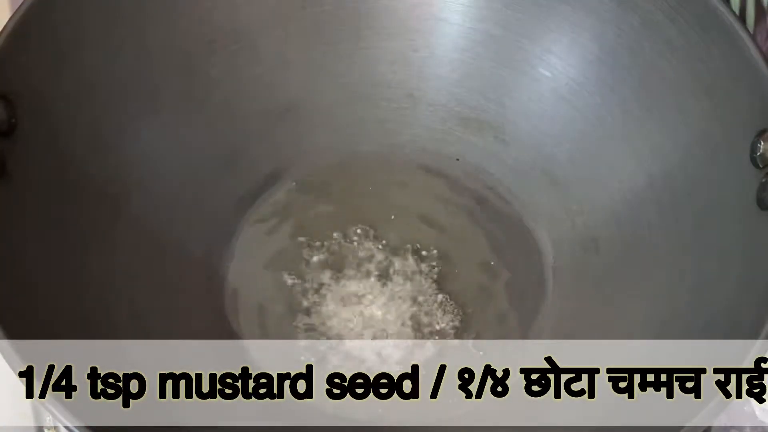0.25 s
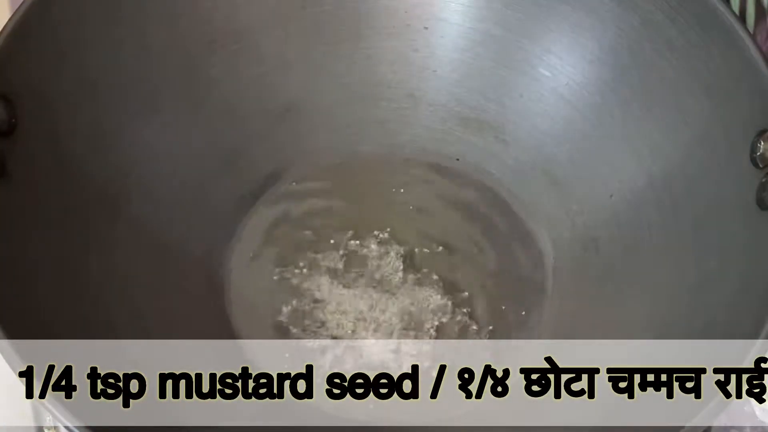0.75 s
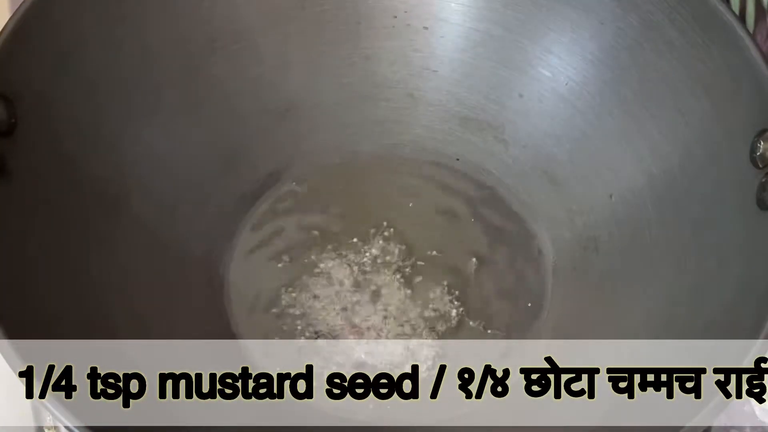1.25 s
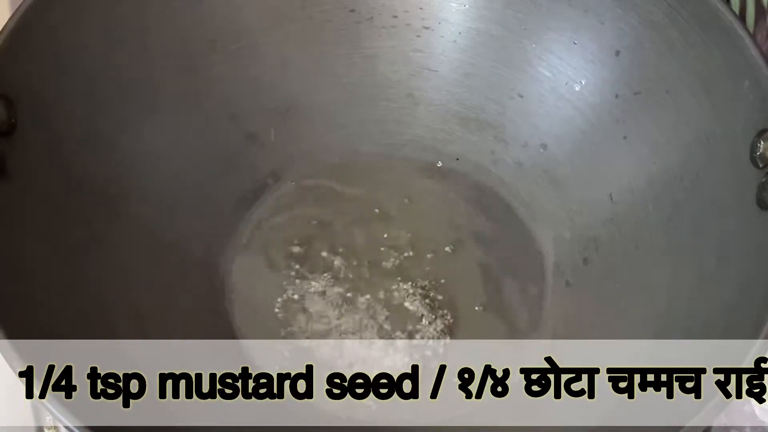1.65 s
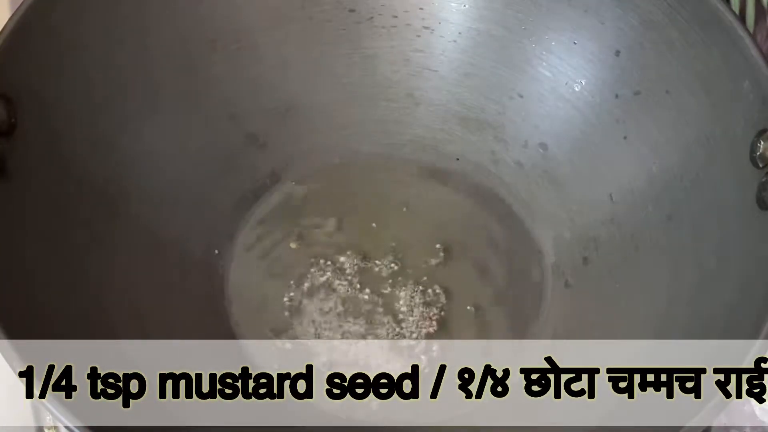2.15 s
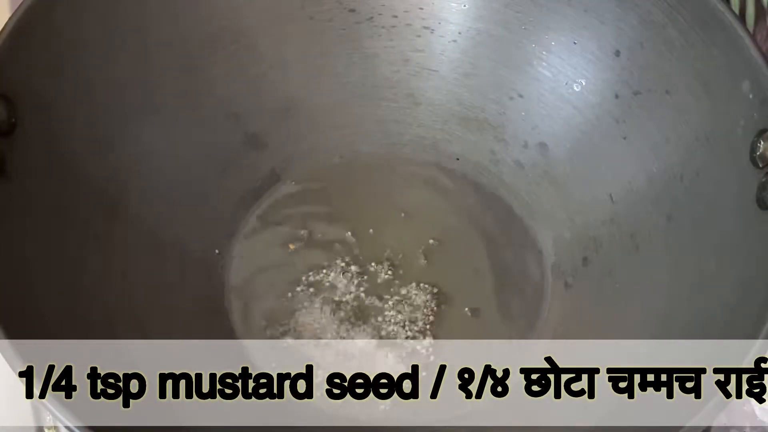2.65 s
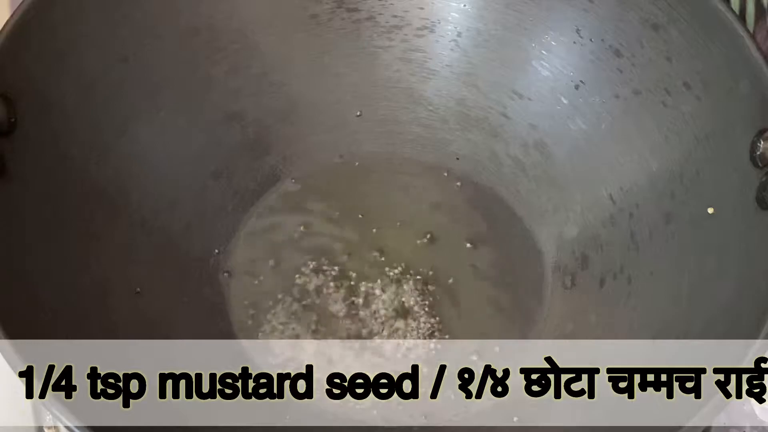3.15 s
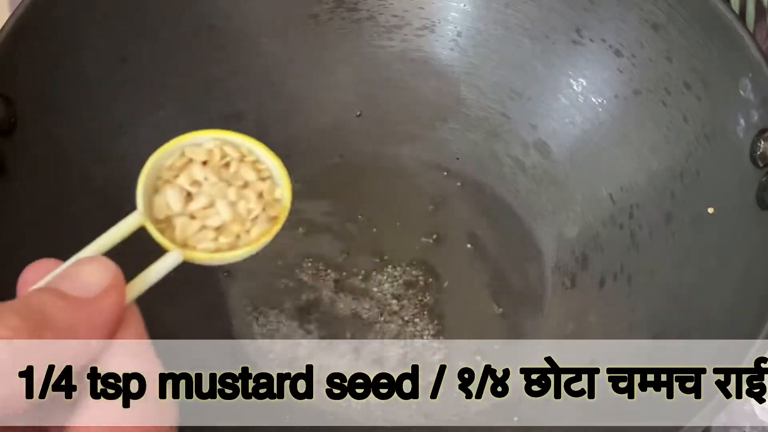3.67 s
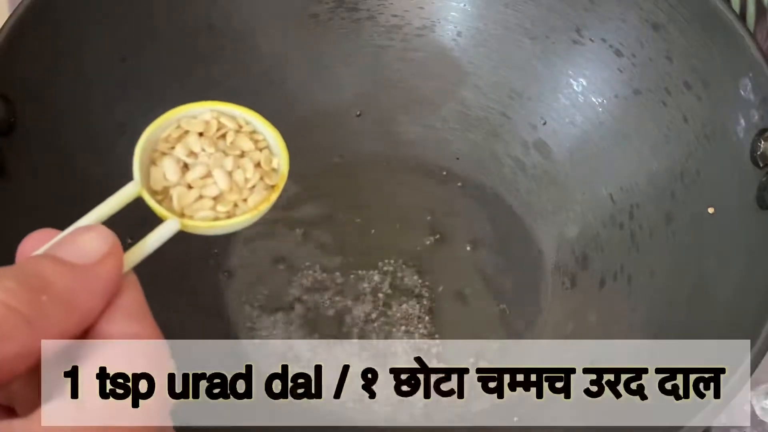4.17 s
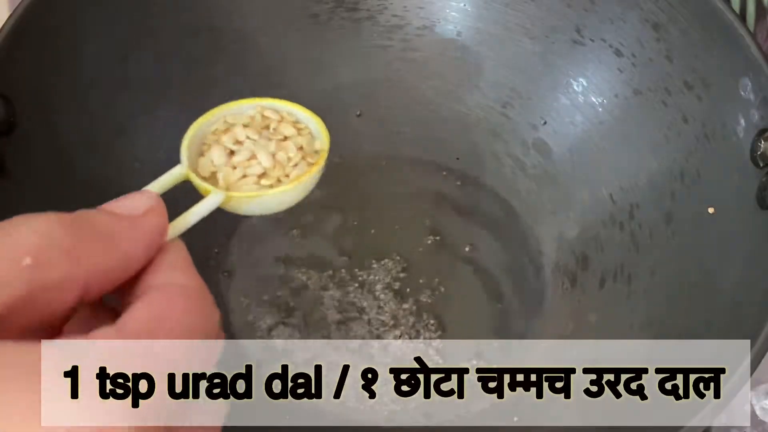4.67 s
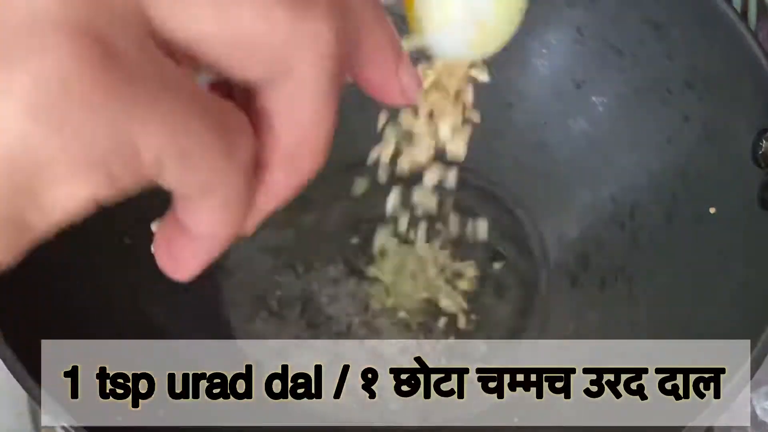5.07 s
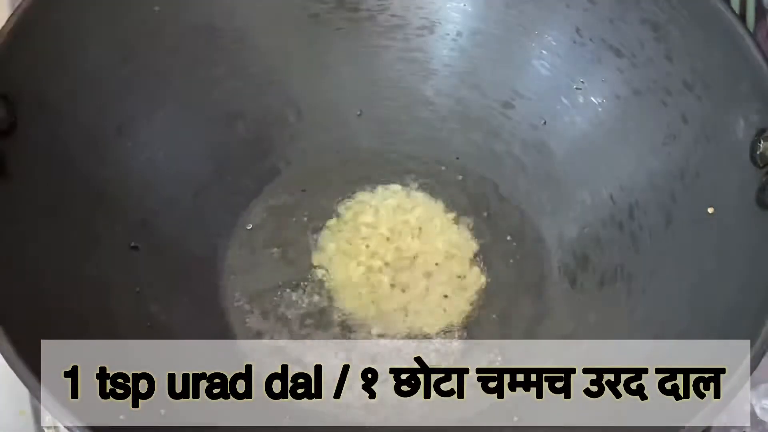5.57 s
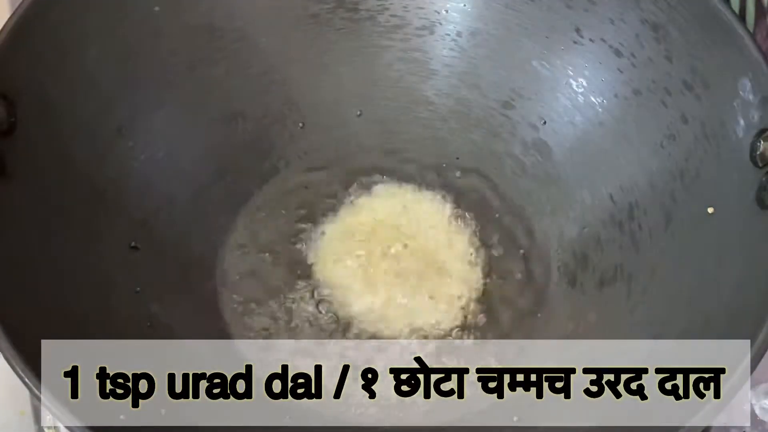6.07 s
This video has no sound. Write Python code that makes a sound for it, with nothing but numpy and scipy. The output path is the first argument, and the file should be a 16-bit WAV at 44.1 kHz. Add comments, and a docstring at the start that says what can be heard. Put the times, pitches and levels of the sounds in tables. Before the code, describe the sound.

A close view of frying in a steel wok in a kitchen. From 0 to 0.5 s, a faint fine sizzle carries several crisp, high snaps; then it thins to isolated ticks and pops. At about 1.3 s everything fades briefly to near silence and returns by 1.5 s. Around 2 s, several lower, slightly ringing pops come close together; a second short dip falls near 2.65 s. From 2.8 s the oil livens: mustard seeds burst rapidly, bright and dry, in uneven flurries, dense through 3 to 4.4 s. Two soft dull bumps come at 4.7 and 4.77 s, as the sizzle surges around the lentils going in. It eases near 5.4 s, then swells again with steady crackling until the end at 6.3 s. Pops ring briefly in the bowl and room; beneath lie a quiet, wavering low motor hum and a dull airy rush.

```python
"""Mustard seeds in a hot wok

Close on a steel wok: seeds fry in hot oil, and a spoonful of lentils joins near five seconds, as the sizzle surges.
Steam bubbles burst as short pitched pops, sparse then dense; in lively oil a loud one sets off a flurry of small ones.
Noise echoes and faint resonances let them ring on in the bowl and kitchen; random tiny grains make the fine sizzle.
Beneath lie wavering motor tones, a rush of filtered noise and two soft knocks; twice the whole level dips briefly.
"""
import sys
import numpy as np
from scipy import signal
from scipy.fft import rfft, irfft
from scipy.io import wavfile

SR = 44100
rng = np.random.default_rng(int(sys.argv[2]) if len(sys.argv) > 2 else 0)


def file_out(sig):
    """Save sig as 16-bit WAV at sys.argv[1]."""
    # one column per channel
    cols = np.atleast_2d(sig).T
    # limit, then scale
    lim = np.clip(cols, -1, 1)
    pcm = np.round(lim * 32767).astype(np.int16)
    wavfile.write(sys.argv[1], SR, pcm)


N = 278712  # length in samples

# loud bursting bubbles: start_s, relative level_db, nominal pitch_hz, ringing_cycles (to fall 60 dB)
LOUD_POPS = [(0.095, -21, 6660, 6.1), (0.142, -7.5, 7900, 1.7), (0.1841, -20, 6110, 32),
             (0.2017, -18.5, 5300, 4.3), (0.2578, -15.0, 6500, 20), (0.3247, -11, 13880, 1.5),
             (0.3615, -12.0, 9300, 11), (0.378, -15.0, 8590, 14), (0.5124, -24, 11700, 13),
             (0.6566, -19.5, 6160, 8), (0.6764, -22.5, 7990, 14), (0.785, -28.5, 7240, 6.8),
             (1.06, -19.5, 14000, 8), (1.271, -16, 12390, 3), (1.5265, -11.0, 6350, 7.7),
             (1.8612, -8.5, 2700, 2.9), (1.8914, -12, 10360, 3.4), (1.988, -20.5, 14000, 2.4),
             (2.029, -15.5, 2700, 22.5), (2.1083, -29.5, 2940, 4.3), (2.132, -19.5, 5700, 21),
             (2.2127, -20, 3060, 11), (2.2259, -18, 3040, 10), (2.2304, -14.0, 9480, 2.6),
             (2.3294, -20.5, 3100, 19), (2.3799, -13, 6670, 20), (2.409, -21.0, 3200, 18),
             (2.4507, -13.0, 2900, 11.3), (2.554, -21.5, 6060, 6.3), (2.7026, -11, 4670, 5),
             (2.7243, -23, 13960, 6.8), (2.8444, -14.5, 12930, 6.6), (2.889, -11, 11800, 4.8),
             (2.911, -11.5, 3610, 10.5), (2.983, -12.5, 4520, 6.8), (3.0485, -8.5, 7140, 7.9),
             (3.0632, -14.5, 6150, 25), (3.1074, -17, 12040, 12.6), (3.1644, -6.5, 9430, 1.85),
             (3.214, -5, 3590, 2.7), (3.2291, -7, 3480, 6.9), (3.2745, -9, 11940, 5.4),
             (3.2798, -9.5, 3570, 6.6), (3.288, -12.5, 5200, 8.5), (3.3117, -7, 13870, 2.3),
             (3.4158, -12, 11300, 2.9), (3.4224, -18, 7100, 5.7), (3.4933, -12, 3800, 7),
             (3.4993, -15, 6690, 3.4), (3.565, -17.5, 11160, 5.8), (3.608, -12, 4620, 3.1),
             (3.6356, -10.5, 6000, 4.2), (3.6652, -12, 13900, 6.9), (3.7451, -12.5, 6930, 34),
             (3.752, -13.5, 3570, 7.9), (3.764, -9, 4120, 3.8), (3.7718, -6.5, 3200, 3.6),
             (3.8375, -13.5, 4795, 4.5), (3.8522, -17.0, 5270, 19), (3.8881, -18, 9800, 7.7),
             (3.9335, -9.5, 6850, 6.2), (3.9414, -10.5, 4870, 1.76), (3.9648, -8, 12090, 3.4),
             (4.0057, -14, 3680, 12.2), (4.0545, -9.5, 3710, 5.9), (4.065, -4.5, 5590, 3.7),
             (4.083, -10, 4790, 5), (4.0952, -11.5, 3670, 2.8), (4.1373, -9, 5460, 5.1),
             (4.2099, -19.5, 5350, 8), (4.2372, -8, 5310, 9.1), (4.258, -5, 3850, 3.9),
             (4.2852, -9.0, 10970, 2.66), (4.378, -18, 5580, 4.2), (4.4198, -12.5, 12800, 3.4),
             (4.4284, -16.5, 12920, 6.9), (4.471, -11, 4710, 2.9), (4.5507, -13.5, 5680, 17.3),
             (4.5605, -10, 7010, 6.8), (4.6201, -7.0, 6670, 1.95), (4.681, -16, 14080, 7.1),
             (4.742, -5.5, 6290, 4), (4.766, -9.5, 11740, 2.4), (4.7904, -18, 10970, 4.6),
             (4.8878, -11, 6560, 4.3), (4.8911, -10, 3810, 2.8), (4.9098, -20, 6570, 2.6),
             (4.9148, -14.5, 6640, 23), (4.921, -9.5, 7100, 15), (4.928, -20, 7060, 18),
             (4.986, -14.5, 4080, 5.5), (5.0433, -14, 9200, 4.1), (5.05, -17, 9980, 9.3),
             (5.1176, -12, 9500, 19), (5.1627, -9.5, 11360, 5), (5.192, -13, 5900, 8.6),
             (5.2453, -7.5, 4500, 4.6), (5.2695, -12.5, 6160, 10.3), (5.2966, -7, 3570, 3.2),
             (5.3451, -12, 4290, 6.4), (5.3538, -13.5, 4554, 5), (5.4096, -16.5, 4560, 6.4),
             (5.4632, -7, 3810, 4.1), (5.492, -15, 5520, 8.1), (5.5294, -10.5, 5970, 10.4),
             (5.6143, -16, 6600, 7.1), (5.6223, -24, 6030, 35), (5.6363, -12.5, 6940, 3),
             (5.6581, -13, 4600, 5.1), (5.7293, -20, 5850, 10.6), (5.8182, -7.5, 4840, 5.3),
             (5.8276, -8, 4900, 3.4), (5.8461, -10, 3750, 10), (5.8791, -9.5, 5000, 12.6),
             (5.9877, -13, 5820, 11), (6.004, -11.5, 4245, 4.7), (6.0982, -10, 7700, 4.9),
             (6.1336, -12.0, 4850, 6.3), (6.178, -14, 6040, 15), (6.2134, -8.5, 4340, 4.8),
             (6.2758, -12.5, 5730, 9.3), (6.298, -7.5, 3930, 5.2)]
# vigour of the frying, as the relative level of its fine sizzle: time_s, vigour_db
VIGOUR = [(0, -50.5), (.38, -52), (.5, -59), (.9, -58), (1.7, -67.5), (2.0, -58), (2.55, -62), (2.8, -48),
          (3.25, -51), (4.1, -52), (4.42, -57), (4.7, -46), (5, -47), (5.45, -55.5), (5.9, -49),
          (6.32, -47)]


def from_db(db):
    """Decibels to amplitude gain."""
    return 10 ** (np.asarray(db) / 20)


def rms_one(x):
    """Scale to unit rms."""
    return x / np.sqrt(np.mean(x ** 2) + 1e-20)


def in_time(rows):
    """Read a curve of (time_s, value) rows at every sample."""
    return np.interp(np.arange(N) / SR, *np.transpose(rows))


def at_hz(points, hz):
    """Read a spectrum on a log-frequency axis."""
    points = np.array(points)
    return np.interp(np.log(np.maximum(hz, 1)), np.log(points[:, 0]), points[:, 1])


def coloured(x, points):
    """Weight a sound by a spectrum in dB."""
    size = x.shape[-1]
    gain = from_db(at_hz(points, np.fft.rfftfreq(size, 1 / SR)))
    return irfft(rfft(x) * gain, size)


def drift(rate_hz):
    """Slow random movement of unit rms: noise with little left above the given rate."""
    hz = np.fft.rfftfreq(N, 1 / SR)
    noise = rfft(rng.standard_normal(N))
    return rms_one(irfft(noise / (1 + (hz / rate_hz) ** 2) ** 2, N))


def ring(clicks, hz, t60):
    """A resonance: a unit click starts a cosine of height 1 that falls 60 dB in t60 seconds."""
    radius = from_db(-60 / (t60 * SR))
    step = 2 * np.pi * min(hz, .45 * SR) / SR  # radians per sample
    top = [1, -radius * np.cos(step)]
    bottom = [1, -2 * radius * np.cos(step), radius * radius]
    return signal.lfilter(top, bottom, clicks + 1e-18)


def bell(x, hz, width_hz, gain_db):
    """Raise or lower one band by adding a share of what a resonant peak lets through."""
    band = signal.lfilter(*signal.iirpeak(hz, hz / width_hz, fs=SR), x)
    return x + (from_db(gain_db) - 1) * band


def panned(x, left_db):
    """Lean a sound to one side; left_db is left minus right."""
    return x * from_db(np.array([[.5], [-.5]]) * left_db)


def radiate(x, edge_hz):
    """Small bubbles radiate hardly any bass: a steep high-pass."""
    return signal.sosfilt(signal.butter(8, edge_hz, "high", fs=SR, output="sos"), x)


def sizzle(per_s, spread_db, cycles, count=16):
    """Fine fizz of rms 1: tiny bubbles born at random times each ring at one of count pitches."""
    # spectrum of the sizzle: frequency_hz, relative level_db
    colour = [(2500, -3), (3600, -6), (4800, -12.5), (6000, -3.5), (7500, -4), (8400, -9), (9600, -5.5),
              (12000, -3), (15500, -6.5)]
    sizes = from_db(spread_db * np.minimum(rng.exponential(1, N), 3)) * rng.choice([-1, 1], N)
    born = rng.random(N) < per_s / SR
    pitch_of = rng.integers(0, count, N)
    grains = 0
    for k, hz in enumerate(np.linspace(3000, 15500, count)):
        clicks = sizes * born * (pitch_of == k)
        grains = grains + ring(clicks, hz, cycles / hz) * np.sqrt(hz)
    return rms_one(coloured(radiate(grains, edge_hz=2420), colour))


def hum(waver_hz):
    """Motor tones under the frying: each sine wavers slowly in strength and phase."""
    # motor tones: pitch_hz, rms_db (mean of the sides), unsteadiness (0-1), left_minus_right_db
    tones = [(72.2, -67.5, 0.7, -1), (95.9, -66, 0.5, -0.5), (119.4, -51.5, 1, -1.5), (128.6, -59, 1, -3.5),
             (149.2, -51, 0.22, 0.5), (256.2, -66, 0.83, -3.5), (291, -65, 0.95, -4),
             (368, -69.5, 0.3, -17)]
    t = np.arange(N) / SR
    out = 0
    for hz, db, unsteady, left_db in tones:
        wander = (drift(waver_hz) + 1j * drift(waver_hz)) / np.sqrt(2)
        waver = 1 - np.clip(unsteady, 0, 1) + unsteady * wander
        turning = np.exp(2j * np.pi * (hz * t + rng.random()))
        tone = rms_one(np.real(waver * turning))
        out = out + panned(from_db(db) * tone, left_db)
    return out


def air(level_db):
    """A dull steady rush around the stove: filtered noise, its left-right likeness set by frequency."""
    # spectrum of the rush: frequency_hz, relative level_db (per Hz)
    colour = [(20, -15), (55, -10.5), (85, -3.5), (130, 5), (200, -1.5), (290, -3), (400, -7), (520, -8),
              (750, -13.5), (1150, -14.5), (1600, -13), (2100, -19.5), (2900, -21), (4300, -39),
              (16000, -28)]
    # left-right likeness of the rush: frequency_hz, correlation (-1 to 1)
    likeness = [(60, 1), (200, 0.79), (380, 1), (700, 0.37), (1300, -0.18), (2400, -0.0021), (4400, 1)]
    mid, side = rfft(rng.standard_normal((2, N)))
    alike = np.clip(at_hz(likeness, np.fft.rfftfreq(N, 1 / SR)), -1, 1)
    both = irfft(np.sqrt(1 + alike) * mid + np.sqrt(1 - alike) * side * [[1], [-1]], N)
    return from_db(level_db) * rms_one(coloured(both, colour))


def small_pops(count=130):
    """Rows like those of the loud bubbles, by chance: thicker in livelier oil, mostly in flurries."""
    simmer_db, lively_db = -58, -52  # vigour where small bubbles begin, and where they reach full rate
    flurry_share, flurry_s = .65, .025  # share that follows loud bursts, and decay time of a flurry
    level_db, spread_db = -22, 3.0  # typical relative level and its spread
    pitch_hz, pitch_spread_oct = 6550, .38
    ringing_cycles, ringing_spread_oct = 4.3, .81
    t = np.arange(0, N / SR, .001)
    vigour_db = np.interp(t, *np.transpose(VIGOUR))
    lively = np.clip((vigour_db - simmer_db) / (lively_db - simmer_db), 0, 1)
    stirred = sum((t > s) * np.exp(-abs(t - s) / flurry_s) for s, *_ in LOUD_POPS)
    share = np.clip(flurry_share, 0, 1)
    due = np.cumsum(lively * (1 - share + share * stirred / stirred.mean()))
    # even shares of the summed rate, each jittered, become burst times
    times = np.interp((np.arange(count) + rng.random(count)) / count, due / due[-1], t)
    level, pitch, ringing = np.clip(rng.standard_normal((count, 3)), -2, 2).T
    return np.column_stack([times,
                            level_db + spread_db * level,
                            pitch_hz * 2 ** (pitch_spread_oct * pitch),
                            ringing_cycles * 2 ** (ringing_spread_oct * ringing)])


def burst(db, hz, cycles, size=1024):
    """A bubble opens a little cavity in the oil, which rings briefly and rises in pitch as it fills."""
    age = np.arange(size) / SR * hz / max(cycles, 1)  # 1 when the tone has fallen 60 dB
    pitch = hz * (.98 + .2 * np.minimum(age, 1))
    phase = 2 * np.pi * (np.cumsum(pitch) - pitch[0]) / SR
    return from_db(db - 60 * age) * np.cos(phase)


def pops(level_db, scatter_db, scatter_t60, bowl_db, bowl_t60, width, pan_db, size=1024):
    """Bursts at the microphone: each direct tone plus brief noise echoes off the oil and the bowl."""
    out = np.zeros((2, N + size))
    t = np.arange(size) / SR
    for s, db, hz, cycles in [*LOUD_POPS, *small_pops()]:
        # every bubble lies somewhere else, so its echoes have a pattern of their own
        paths = signal.unit_impulse(size)
        for echo_db, t60 in (scatter_db, scatter_t60), (bowl_db, bowl_t60):
            mid, side = rng.standard_normal((2, size)) * t * from_db(-60 * t / t60)
            echo = rms_one(mid + width * side * np.array([[1], [-1]])) / np.sqrt(size)
            paths = paths + from_db(echo_db) * echo
        tone = burst(db + level_db, hz, cycles)
        heard = irfft(rfft(paths, 2 * size) * rfft(tone, 2 * size))[:, :size]
        at = int(np.clip(s * SR, 0, N - 1))
        # the echoes colour the burst and spread it in time; its energy stays
        level_kept = rms_one(heard) * np.std(tone)
        out[:, at:at + size] += panned(level_kept, pan_db * rng.standard_normal())
    return out[:, :N]


def plop(x, level_db):
    """A trace of low thud goes with each burst: a gentle band-pass, not sent to the room echoes."""
    return from_db(level_db) * signal.sosfilt(signal.butter(1, [450, 1500], "band", fs=SR, output="sos"), x)


def echoes(x, delay_s, t60, level_db, width):
    """Dense reflections: decaying noise that starts after a delay, a little different at each side."""
    # colour of the echoes in the bowl and the kitchen: frequency_hz, relative level_db
    colour = [(500, 17), (1600, 29), (2800, -3.5), (3700, 0.5), (4300, -0.5), (5000, 1), (7300, -5),
              (8400, -2), (9600, -4.5), (12000, -1.5), (16000, -11)]
    t = np.arange(SR // 2) / SR
    mid, side = coloured(rng.standard_normal((2, len(t))), colour)
    onset = np.clip((t - delay_s) * 1000, 0, 1)  # rises over 1 ms
    decay = onset * from_db(-60 * t / t60)
    response = (mid + width * side * np.array([[1], [-1]])) * decay / np.sqrt(np.sum(decay ** 2))
    return from_db(level_db) * signal.fftconvolve(response, x[None], axes=1)[:, :N]


def wok(x):
    """The frying sets the steel bowl ringing faintly, through a bank of decaying resonances."""
    # resonances of the bowl: pitch_hz, relative level_db, t60_s
    modes = [(3570, -19, .14), (3590, 7, 0.083), (3752, 11, 0.091), (3680, -6, 0.16), (3830, -17, 0.14),
             (4270, -32, 0.18), (4930, 7, 0.11), (5100, -14, 0.16), (5880, 16.5, 0.033),
             (7520, 15.5, 0.053), (7120, 13.5, 0.062), (9050, 11, .08)]
    return from_db(-56) * sum(from_db(db) * ring(x, hz, t60) for hz, db, t60 in modes)


def ports(x):
    """The treble reaches the two microphone ports out of step: a phase lead set by frequency."""
    # lead of the left port over the right: frequency_hz, phase_rad
    leads = [(3000, 0), (5200, .15), (10400, 0), (11500, -.7), (12000, -1.7), (12800, -3.1), (13800, -5.2),
             (14900, -6.3)]
    lead = at_hz(leads, np.fft.rfftfreq(N, 1 / SR))
    return irfft(rfft(x) * np.exp(1j * lead * np.array([[.5], [-.5]])), N)


def dips():
    """Gain of the brief dips in level: straight fades down to near silence and back."""
    # dips: fade_start_s, near_silent_from_s, near_silent_until_s, full_again_s
    fades = [(1.232, 1.326, 1.357, 1.517), (2.524, 2.641, 2.668, 2.857)]
    t = np.arange(N) / SR
    gain = 1
    for start, silent, until, back in fades:
        fall = (silent - t) / (silent - start)
        rise = (t - until) / (back - until)
        gain = gain * np.clip(np.maximum(fall, rise), .006, 1)
    return gain


def knocks(glide_s):
    """Soft dull bumps of the hand at the stove: short sines that glide down, so their lows arrive last."""
    # knocks: start_s, peak_db, first_pitch_hz, last_pitch_hz, length_s (to fall 60 dB)
    bumps = [(4.6821, -33.5, 680, 85, .027), (4.7665, -38.5, 450, 150, .018)]
    out = 0
    for s, db, first_hz, last_hz, length in bumps:
        t = np.maximum(np.arange(N) / SR - s, 0)
        turns = last_hz * t + (first_hz - last_hz) * glide_s * (1 - np.exp(-t / glide_s))
        envelope = from_db(db - 60 * np.minimum(t / length, 2) ** 3)
        out = out + envelope * np.sin(2 * np.pi * turns)
    return out


def scene():
    """The frying in its bowl and room, over hum, air and knocks, all under the dips."""
    bursts = pops(level_db=-1.0, scatter_db=-2.5, scatter_t60=.002, bowl_db=-7.5, bowl_t60=0.0089,
                  width=0.4, pan_db=0.6)
    # two treble bands of the pops stand out
    bright = radiate(bursts, edge_hz=2690)
    bright = bell(bright, hz=9640, width_hz=960, gain_db=6.5)
    bright = bell(bright, hz=13300, width_hz=1150, gain_db=8.0)
    activity = from_db(in_time(VIGOUR))
    fizz = from_db(-9) * activity * sizzle(per_s=8000, spread_db=-1, cycles=4.7)
    # livelier oil throws off more small ticks, each no louder than before
    tick_rate = 90 * activity ** 2 / np.mean(activity ** 2)
    ticks = from_db(-58.5) * sizzle(per_s=tick_rate, spread_db=3.5, cycles=11)
    oil = bright + fizz + ticks
    oil_mono = oil.mean(axis=0)
    kitchen = echoes(oil_mono, delay_s=0.0043, t60=0.19, level_db=-6.5, width=0.033)
    frying = ports(oil + plop(bursts, level_db=-9.5) + kitchen + wok(oil_mono))
    low = hum(waver_hz=4.4) + knocks(glide_s=0.0022) + panned(air(level_db=-53.5), left_db=-2)
    return (panned(frying, left_db=0.4) + low) * dips()


def record(dry):
    """The top is cut steeply above 16.2 kHz."""
    return signal.sosfilt(signal.ellip(10, .1, 70, 16200, fs=SR, output="sos"), dry)


dry = scene()
out = record(dry)
file_out(out)
```